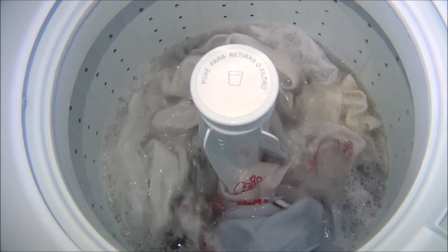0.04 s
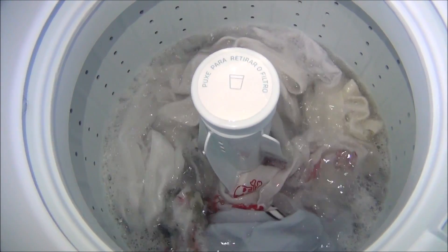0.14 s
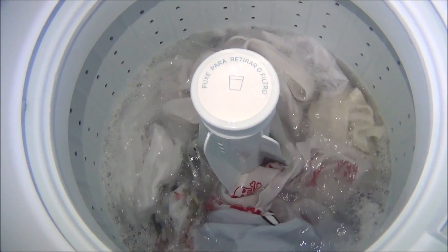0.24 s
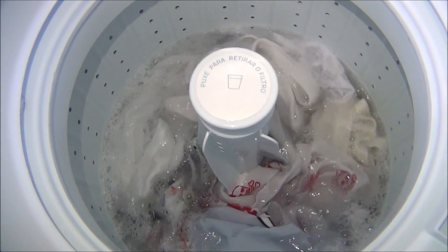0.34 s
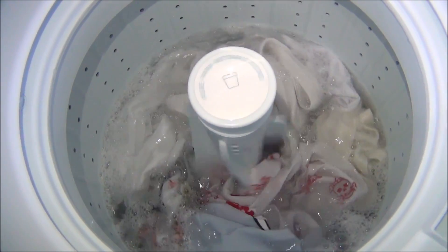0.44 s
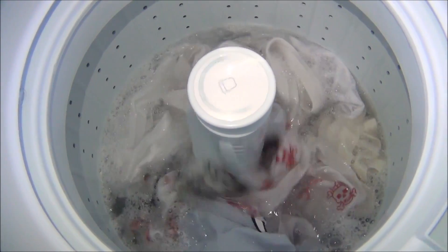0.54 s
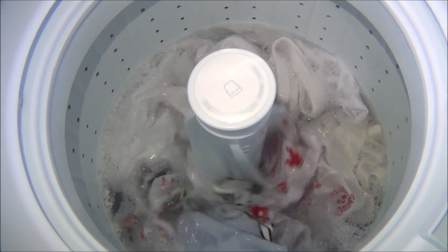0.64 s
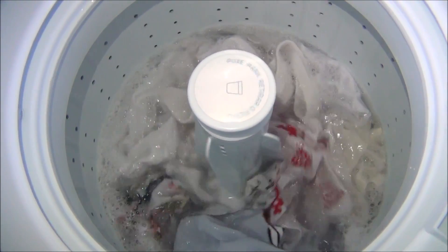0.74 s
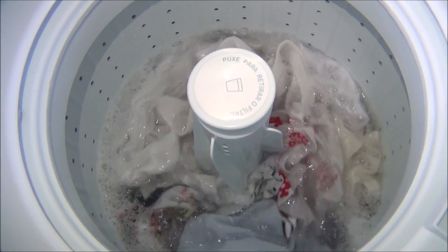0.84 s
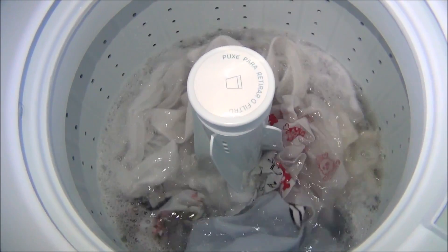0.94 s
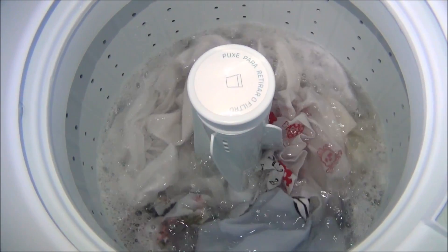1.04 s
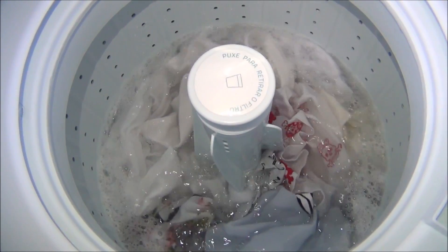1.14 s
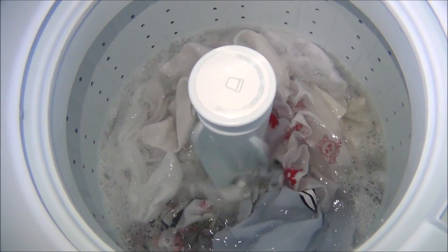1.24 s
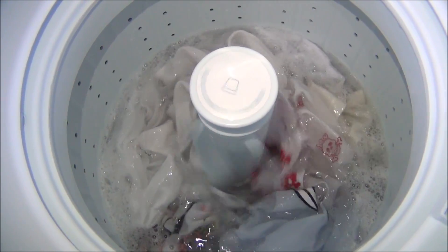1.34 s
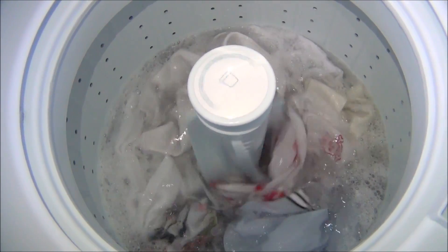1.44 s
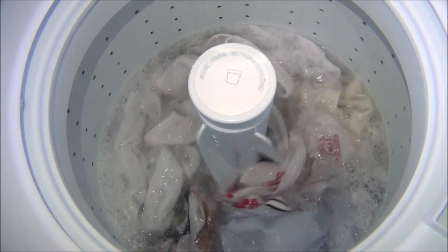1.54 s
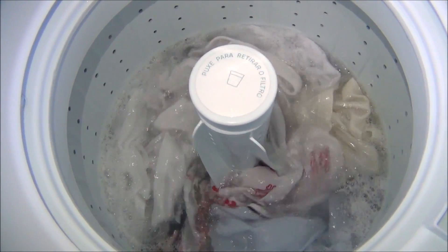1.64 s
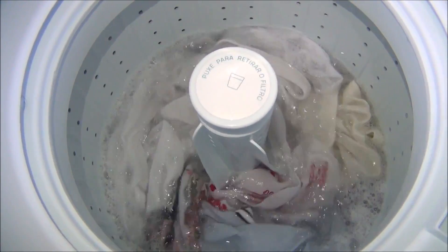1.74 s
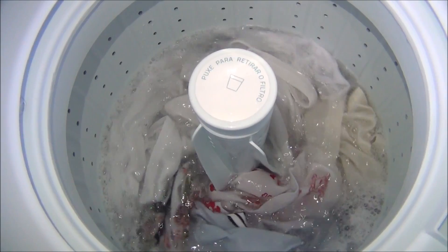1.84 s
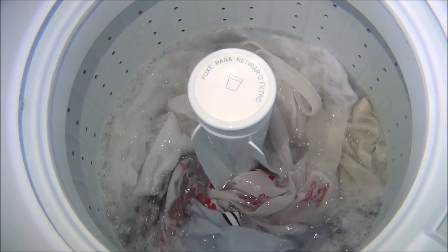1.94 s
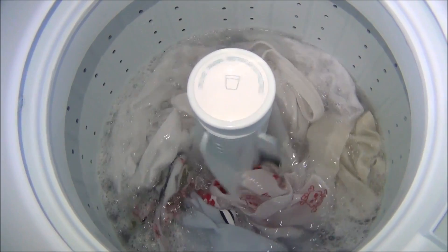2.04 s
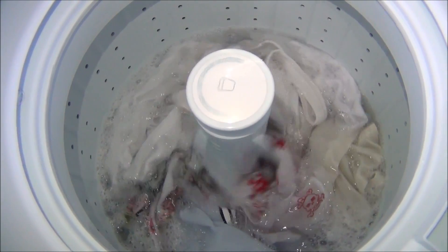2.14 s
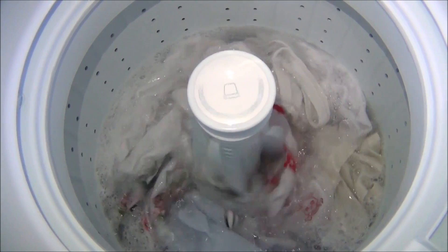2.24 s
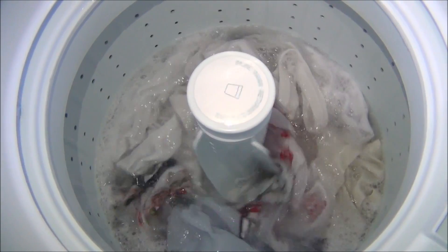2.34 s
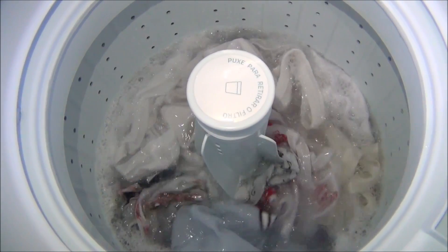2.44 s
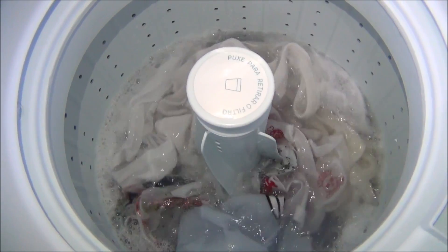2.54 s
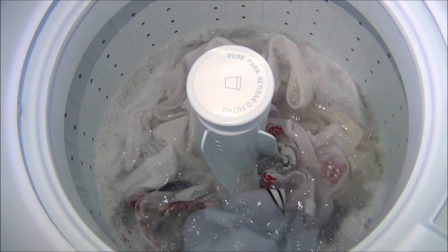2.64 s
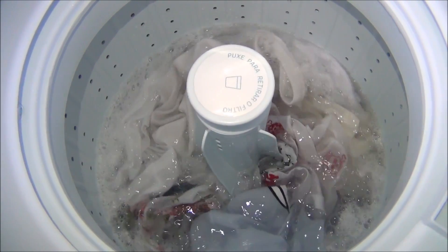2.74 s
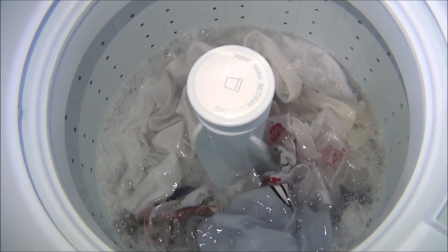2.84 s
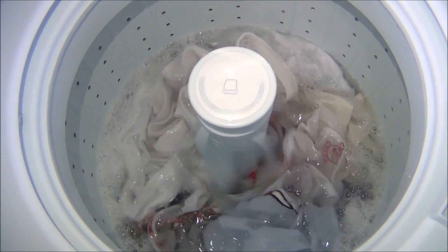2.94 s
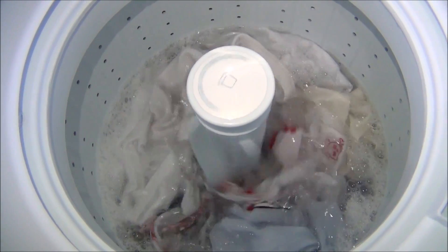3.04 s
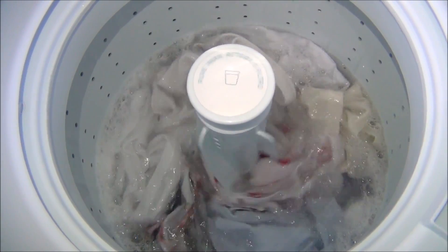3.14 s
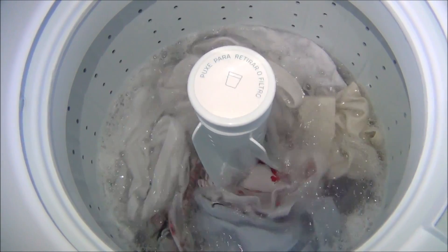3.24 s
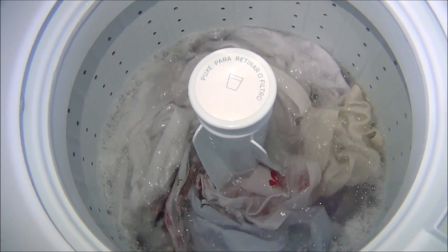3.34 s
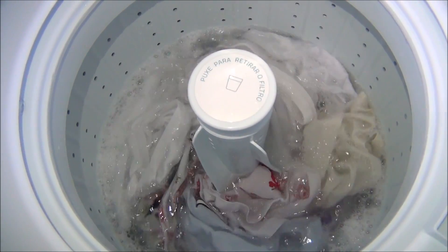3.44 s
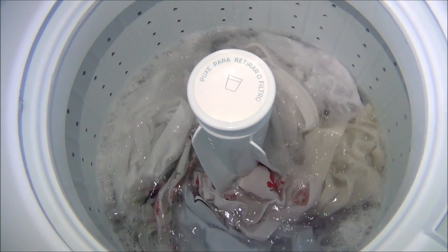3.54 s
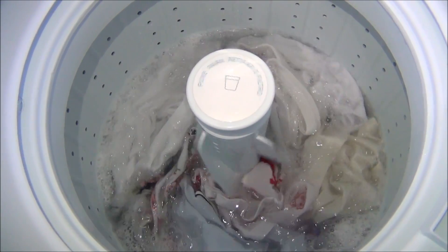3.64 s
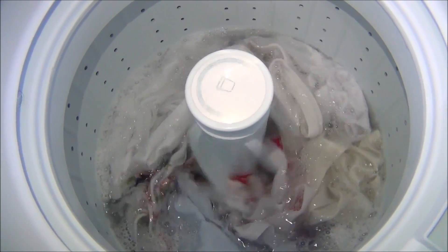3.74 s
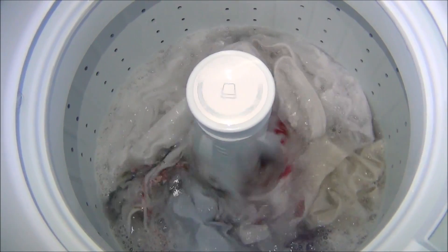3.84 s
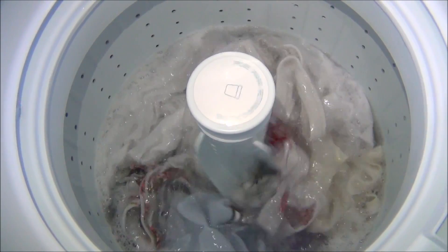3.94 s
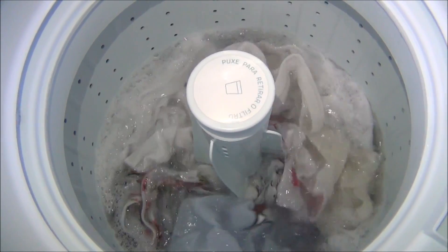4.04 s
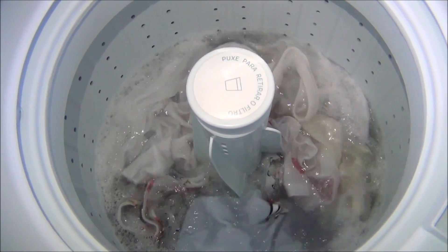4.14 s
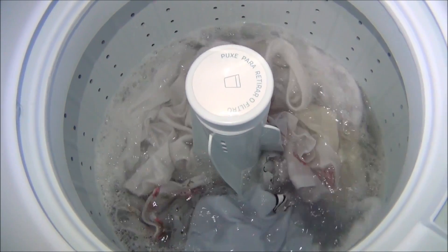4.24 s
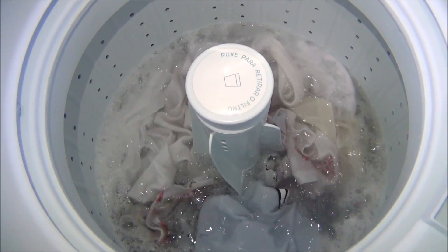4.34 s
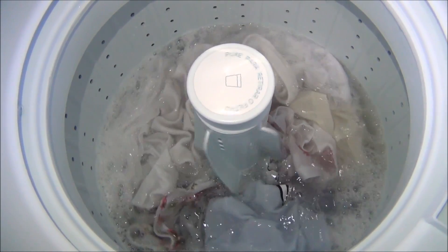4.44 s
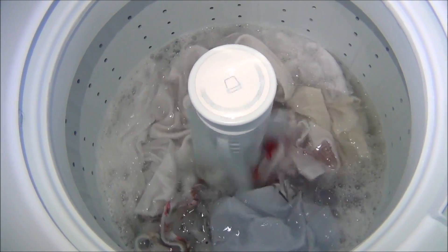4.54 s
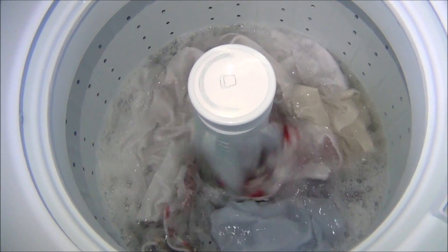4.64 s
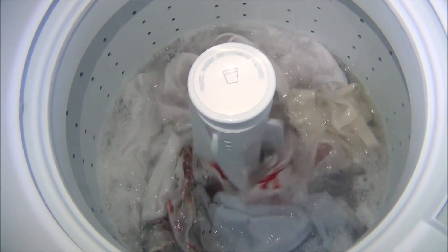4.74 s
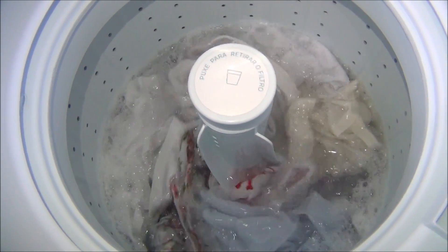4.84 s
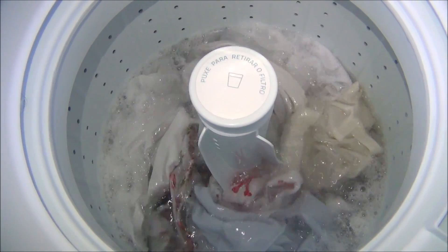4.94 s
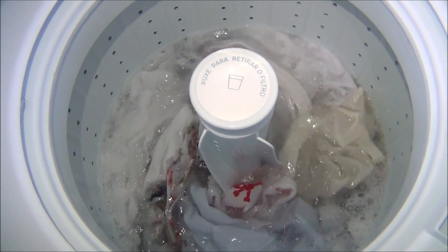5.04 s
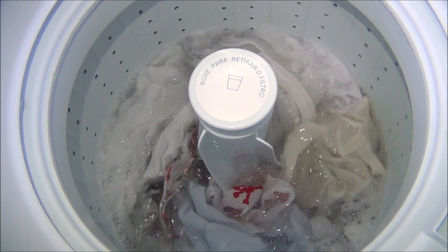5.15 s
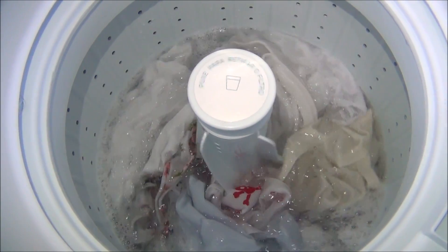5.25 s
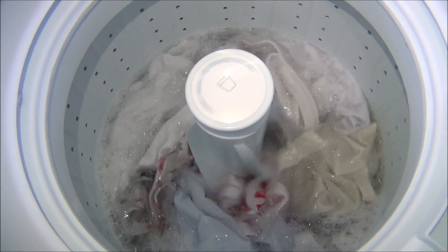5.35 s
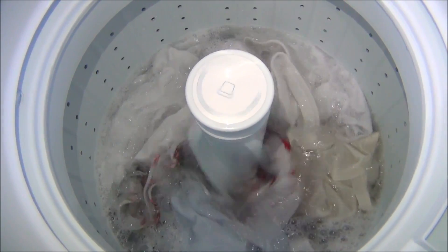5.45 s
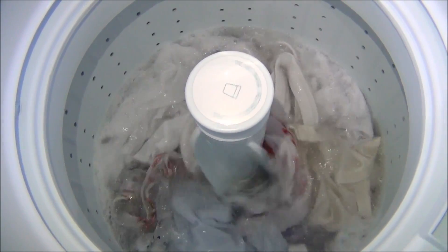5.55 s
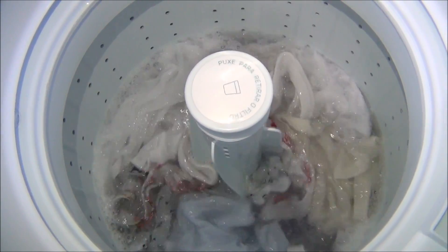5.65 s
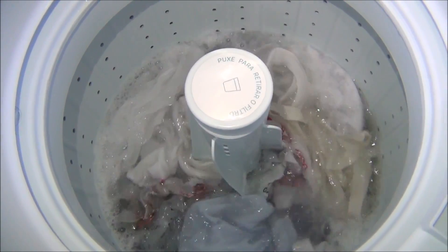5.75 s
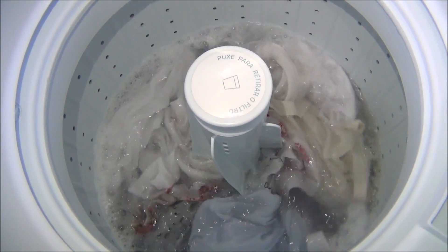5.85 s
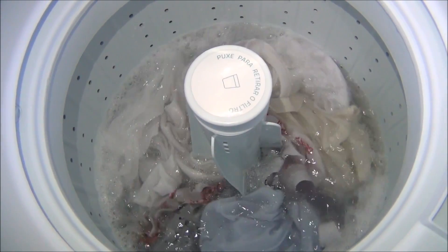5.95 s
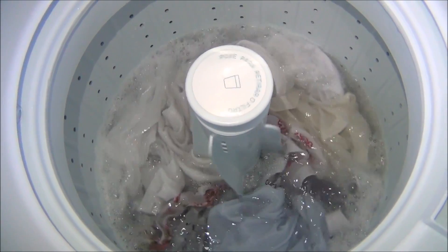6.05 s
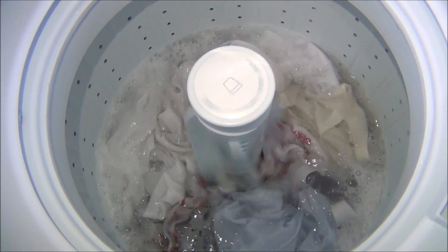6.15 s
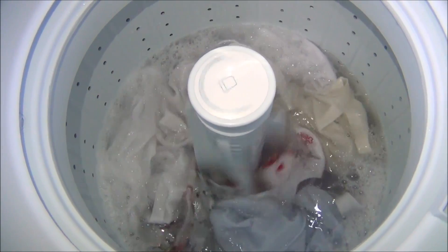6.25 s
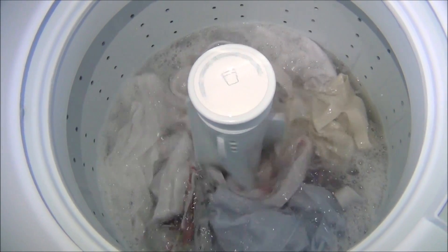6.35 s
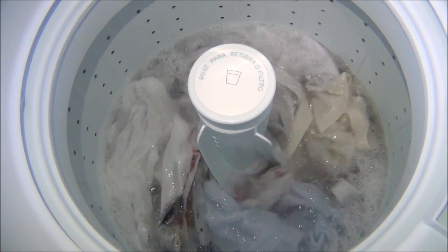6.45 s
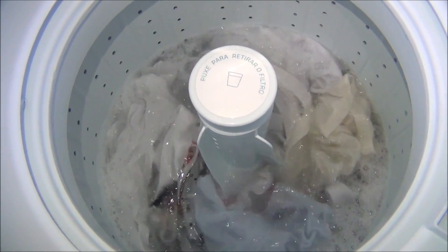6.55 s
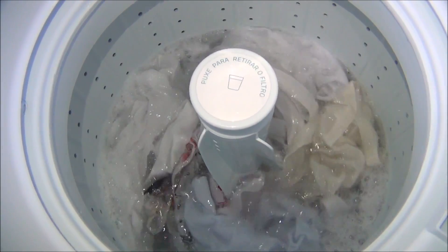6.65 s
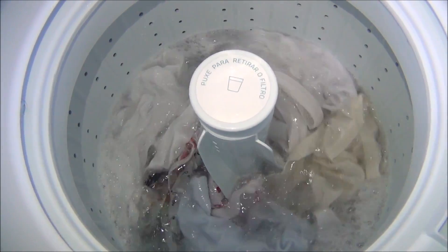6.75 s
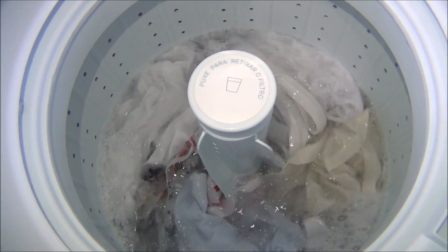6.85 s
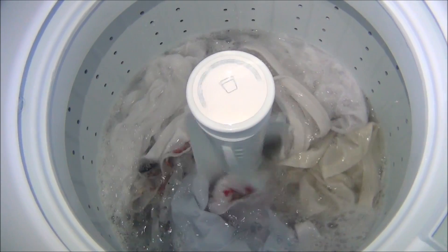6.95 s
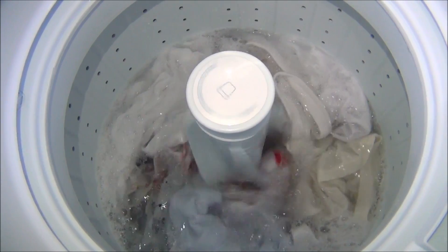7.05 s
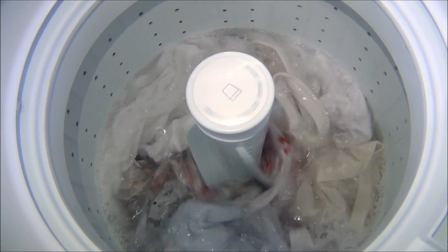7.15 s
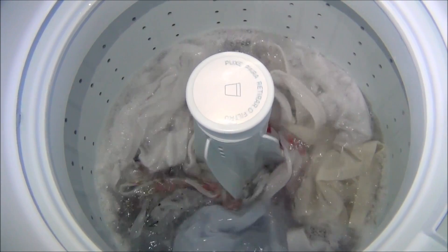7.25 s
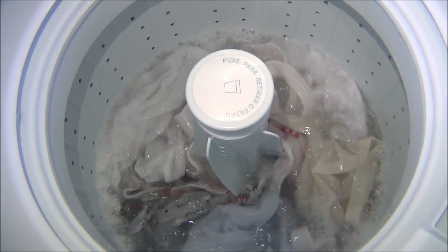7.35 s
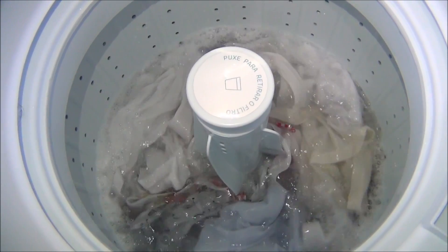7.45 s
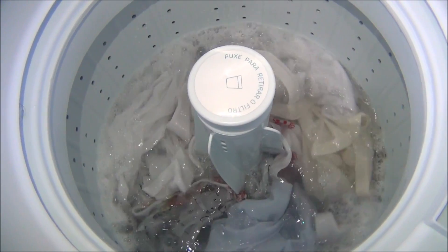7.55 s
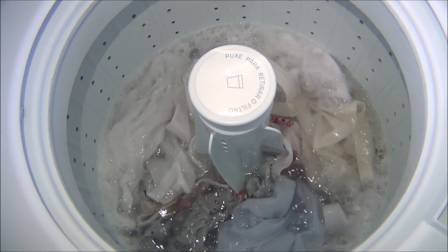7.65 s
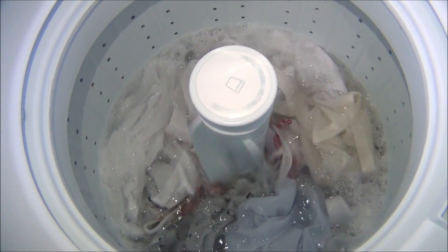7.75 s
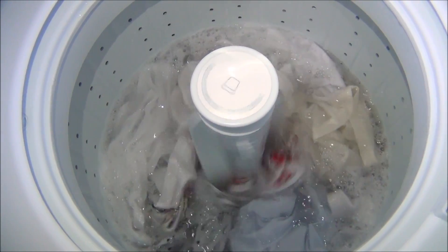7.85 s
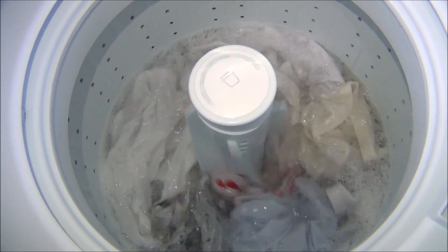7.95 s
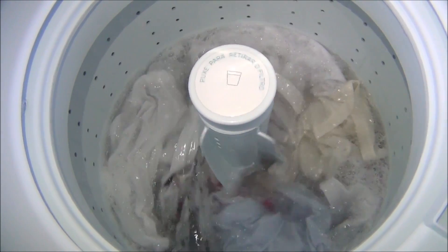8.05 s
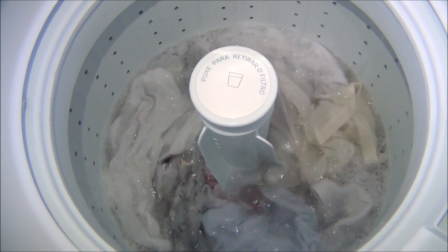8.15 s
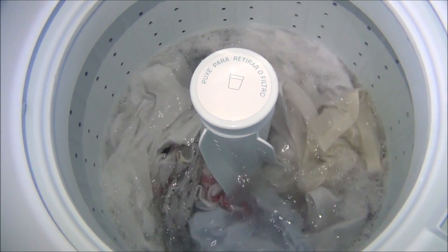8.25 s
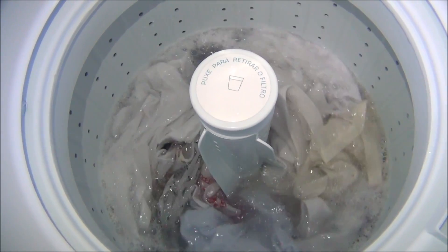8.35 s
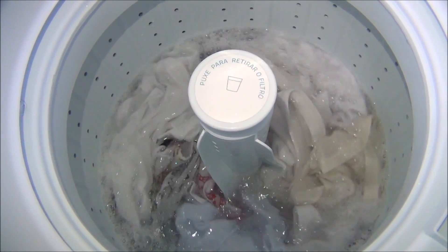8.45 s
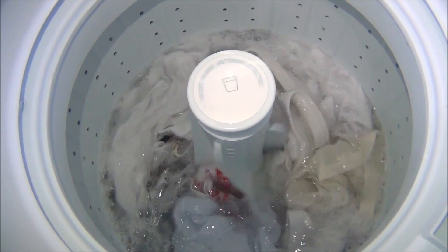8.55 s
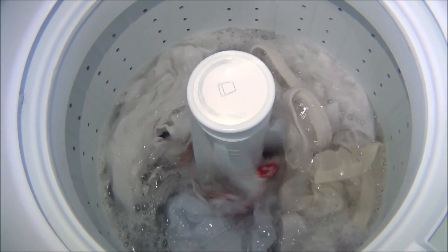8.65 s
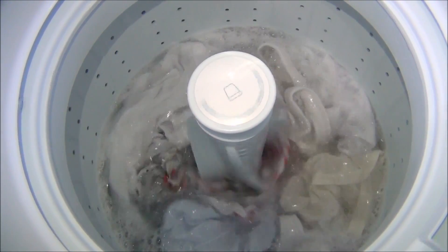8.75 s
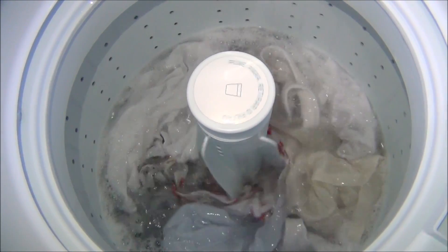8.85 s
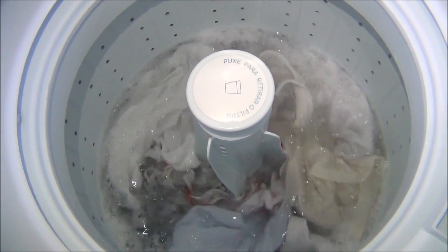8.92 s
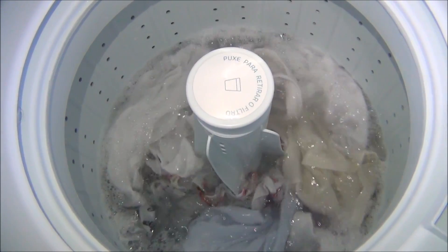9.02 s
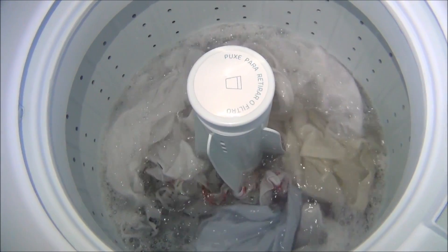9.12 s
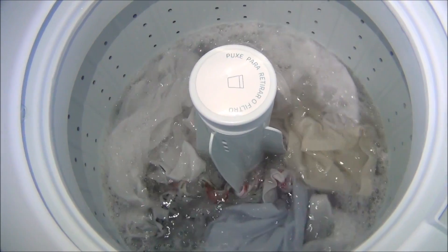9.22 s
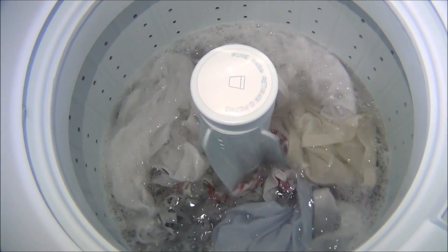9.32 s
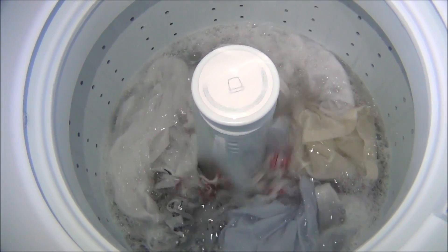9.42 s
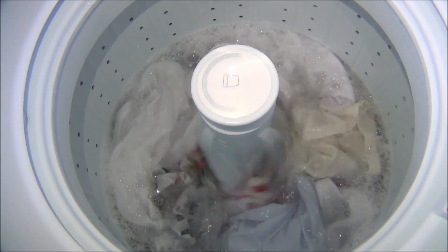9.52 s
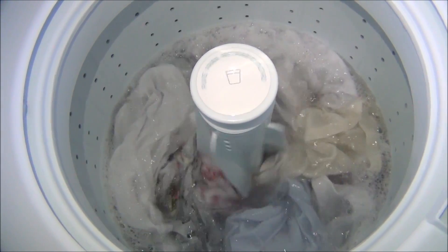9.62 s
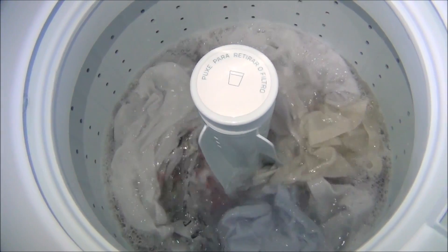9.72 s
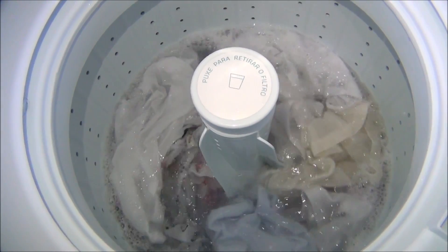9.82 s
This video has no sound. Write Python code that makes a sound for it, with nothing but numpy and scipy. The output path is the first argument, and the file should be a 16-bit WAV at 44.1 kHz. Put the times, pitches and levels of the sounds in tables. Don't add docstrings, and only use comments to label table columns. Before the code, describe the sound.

A top-load washing machine agitates: a humming motor stroke about every 0.8 seconds, each throwing up a hissing, gurgling surge of water that drains in drips.

```python
import sys
import numpy as np
from scipy import signal
from scipy.fft import rfft, irfft, next_fast_len
from scipy.io import wavfile
from scipy.ndimage import uniform_filter1d, map_coordinates

SR = 44100
rng = np.random.default_rng(int(sys.argv[2]) if len(sys.argv) > 2 else 0)


def makeup_ratio(level_db):
    decades = np.asarray(level_db, float) / 20
    return 10 ** decades


def int16_out(signal):
    q = np.round(np.clip(np.atleast_2d(signal).T, -1, 1) * 32767)
    wavfile.write(sys.argv[1], SR, q.astype(np.int16))


N = 435708

KICKS = [-0.38, 0.430, 1.233, 2.049, 2.856, 3.661, 4.482, 5.289, 6.097, 6.913, 7.731, 8.539, 9.347]
# motor_effort_db, surge_db, surge_full_after_s, surge_lasts_s
STROKES = [(-20, -14, 0.17, 0.15), (-20.5, -18.5, 0.2, 0.14), (-21, -17.5, 0.19, 0.14),
           (-20, -17, 0.19, 0.17), (-20.5, -17.5, 0.19, 0.17), (-19.5, -16, 0.21, 0.13),
           (-20.5, -17, 0.19, 0.17), (-20, -17, 0.2, 0.14), (-19.5, -17, 0.19, 0.17),
           (-20, -16.5, .2, 0.13), (-21, -16.5, 0.19, 0.11), (-21, -17.5, 0.21, 0.14),
           (-20.5, -19, 0.17, 0.18)]
# pitch_hz, width_hz, level_db
CABINET = [(265.5, 17.8, -2.5), (357.4, 27, 2), (462, 27.5, -3.5), (517.6, 34, -5), (581.4, 39, -7),
           (697, 41, -6), (782, 53, -7.5), (920, 150, -11)]
# pitch_hz, width_hz, level_db
FRAME = [(30, 15, -13.5), (75.6, 19, -2.5), (93, 32, -3), (113.7, 15.5, -2), (160.6, 18, 3)]
# pitch_hz, over_effort_db, after_s, swells_s, holds_s, fade_db_per_s
LURCH = (72, -11, .16, .045, .02, -150)
RUN_DOWN = (355, -6, .25, .04, .08, -400)
# pitch_hz, level_db
SLOSH = [(410, -32), (700, -40), (1020, -7.5), (1770, 0), (2330, -5), (3060, -4.5), (6000, -16.5),
         (7800, -44), (13200, -120)]
# pitch_hz, level_db
SPRAY = [(2060, -17.5), (3500, -3.5), (4430, -4.5), (6740, -7.5), (7410, -8), (11600, -4.5), (15000, -9),
         (16000, -14.5)]
# pitch_hz, width_hz, gain_db
AIR_COLUMN = [(1183, 180, -10), (1705, 60, 7), (2560, 50, -13.5), (3100, 210, 8)]
# peak_s, level_db, spray_over_slosh_db
SPLASHES = [(0.013, -28, -15), (0.28, -35, -15), (0.885, -25, -18), (0.74, -12.5, -22), (0.943, -27, -7),
            (1.366, -17.5, -8), (1.80, -30, -5.5), (2.34, -15, -21), (2.99, -21, -25), (3.18, -29, -10),
            (3.396, -26, 1.5), (3.53, -41, -13), (4.14, -37, 0), (4.79, -27, -9), (5.083, -30.5, -2.5),
            (5.694, -16, -11), (5.761, -30, -4), (6.57, -21, -14), (6.595, -24.5, -4), (8.165, -47, -5),
            (7.39, -28.5, -1), (7.46, -43, -14), (8.02, -14.5, -3), (8.215, -17, -20), (8.258, -21, -17),
            (9.015, -32, -3), (9.049, -33, 8.5), (9.832, -31, -12)]
# start_s, peak_db
BLOOPS = [(0.616, -11.5), (0.7443, -7), (1.3642, -9), (1.452, -10), (1.4847, -6.5), (2.252, -7),
          (3.171, -12), (3.1851, -3), (4.204, -15.5), (4.795, -1), (5.76, -13.5), (6.2148, -16),
          (6.3125, -6), (6.352, 1), (6.3847, 0.5), (6.4784, -28), (6.573, -20), (7.1848, -2), (7.315, -8),
          (8.015, -2), (8.032, -1.5), (8.2155, -9), (8.31, -22), (8.764, -6), (8.8098, -11), (8.9206, -13),
          (9.51, -16), (9.5213, -13), (9.7308, -13)]
# start_s, peak_db
DRIPS = [(0.102, -24), (0.147, -20), (0.172, -17), (0.201, -21), (0.267, -25), (0.882, -19), (0.947, -23),
         (0.996, -29), (1.731, -25), (1.849, -21), (2.449, -24), (2.484, -11), (2.558, -21), (2.574, -20),
         (2.621, -16.5), (2.67, -28), (3.336, -18), (3.401, -14), (3.437, -26), (4.33, -39), (5.009, -24),
         (5.044, -17), (5.09, -17), (5.789, -17), (5.849, -25), (6.688, -20), (7.402, -24), (7.484, -26),
         (8.971, -16), (9.042, -28)]
# start_s, peak_db, pitch_hz
GULPS = [(0.026, -4.5, 2520), (0.6389, -3.5, 3050), (0.7222, -9, 1910), (1.512, -6, 3060),
         (1.571, -5.5, 2560), (1.705, -11, 3200), (2.2218, -10, 3880), (2.3685, -6, 1920),
         (2.9924, -9, 2380), (3.0646, -6, 1440), (3.0804, 3, 3100), (3.1053, -9, 2400),
         (3.3209, -13.5, 2060), (3.3995, -4.5, 3050), (3.8513, -5.5, 3380), (4.146, -7, 3060),
         (4.636, -11, 1255), (4.6548, -11, 1215), (5.5892, -5, 2100), (6.274, -4, 2980), (6.4, 2, 3500),
         (6.601, -10, 2800), (7.159, -7.5, 1250), (7.237, -12, 1110), (7.2893, -7.5, 1174),
         (7.897, -10.5, 1250), (8.2208, -1, 2190), (8.8673, -10, 1510), (9.6633, -5.5, 3180),
         (9.8326, -16.5, 3080)]
# start_s, peak_db, centre_hz
SPITS = [(0.69, -15, 4010), (0.765, 5.5, 4140), (0.814, 3, 5960), (0.9453, -8, 4020), (1.3646, -5, 12700),
         (1.648, -7.5, 4440), (2.2217, 2.5, 4980), (2.2514, 4, 4130), (5.6416, -6, 11900),
         (3.037, -0.5, 10700), (3.1986, -5, 6820), (3.4023, -3, 4400), (4.137, -12, 5730),
         (4.1985, -10.5, 9190), (4.6334, -1, 9190), (4.6538, -2, 10200), (5.462, 0, 8150),
         (5.696, -1, 11900), (5.759, -6, 4650), (6.221, -10, 5670), (6.345, -3, 4120), (6.5074, -4.5, 5870),
         (6.547, -8, 5070), (7.0874, -4, 5510), (7.9863, -2, 6560), (8.258, -9, 6030), (8.854, 2, 4690),
         (9.0154, -4.5, 5600), (9.0527, -7, 4000), (9.5353, -0.5, 11100)]
# time_s, pitch_hz, level_db
SQUEAK = [(7.54, 10233, -64), (7.56, 9850, -60), (7.6, 9750, -63), (7.66, 10080, -59), (7.73, 9860, -56),
          (7.76, 9750, -69)]
# pitch_hz, time_to_fall_60_db_s
TUB_RING = [(300, 0.13), (1500, 0.089), (5000, 0.061), (14000, 0.034)]
# pitch_hz, level_db
HUSH = [(15, -27), (25, 15), (36, -2), (92, 2.5), (212, -10), (344, -4.5), (1130, -12.5), (1650, -9.5),
        (3920, -28.5), (16000, -28)]
# pitch_hz, side_minus_mid_db
WIDTH = [(60, -22), (110, -20), (200, -19), (380, -15.5), (700, -6.5), (1290, -14.5), (2380, -14),
         (4400, -15), (8120, -3), (15000, -21)]
# pitch_hz, lead_radians
LEAD = [(0, 0.18), (260, 0.34), (780, 0), (1120, 0.8), (2500, 0.26), (16100, 0.46)]

RAREST = .97


def drive():
    def thin_panels(hz):
        return (modes(CABINET[2:])(hz) + 0.04 * (hz > 180)) / (1 + 1j * hz / 900) ** 2

    thin_gain = shaken(full_s=.09, off_s=.28, drop_s=.11, over_db=-2, kick_db=-9, drop_db=-17.5, fade_db=-43)
    big_gain = shaken(full_s=.18, off_s=.31, drop_s=.09, over_db=-0.5, kick_db=-9, drop_db=-14, fade_db=-51,
                      overshoot_db=2)
    frame_gain = shaken(full_s=.2, off_s=.3, drop_s=.1, over_db=-8, kick_db=-6, drop_db=-5, fade_db=-50)
    parts = [(thin_panels, thin_gain), (modes(CABINET[:2]), big_gain), (modes(FRAME), frame_gain)]

    grit = rng.standard_normal((3, N)) * makeup_ratio(1.32 * wobble(60))
    swaying = makeup_ratio(0.97 * wobble(14))
    jolts = clutch_jolts()
    total = note(*LURCH) + note(*RUN_DOWN)
    for force, (body, gain) in zip(grit, parts):
        shake, steady = filtered([(force * swaying + jolts) * gain, force], body)
        total += shake / np.std(steady)
    return total


def clutch_jolts():
    blow_db, blow_s = 33, 0.00031
    jolts = np.zeros(N)
    jolts[[round(s * SR) + 1 for s in KICKS if s > 0]] = makeup_ratio(blow_db)
    for _ in range(2):
        jolts = uniform_filter1d(jolts, int(blow_s * SR))
    return jolts


def shaken(full_s, off_s, drop_s, over_db, kick_db, drop_db, fade_db, overshoot_db=0):
    knots = [0, full_s / 2, full_s, (full_s + off_s) / 2, off_s, off_s + drop_s, off_s + drop_s + 1]
    events = []
    for k, (start, (effort_db, *_)) in enumerate(zip(KICKS, STROKES)):
        halfway_db = kick_db / 2 - overshoot_db / 2
        full_db = overshoot_db * (k % 2)
        shape = np.array([kick_db, halfway_db, full_db, 0, 0, drop_db, drop_db + fade_db])
        events.append((start, knots, effort_db + over_db + shape))
    return repeated(events)


def note(hz, over_db, after, swells, holds, fade_db):
    knots = [0, swells, swells + holds, swells + holds + .2]
    shape = np.array([-20, 0, 0, .2 * fade_db])
    gain = repeated((start + after, knots, effort_db + over_db + shape)
                    for start, (effort_db, *_) in zip(KICKS, STROKES))
    unsteady = makeup_ratio(1.3 * wobble(9.6))
    pitch = hz * (1 + 0.0118 * wobble(9))
    return np.sqrt(2) * gain * unsteady * np.sin(2 * np.pi * np.cumsum(pitch) / SR)


def water():
    jumps = unit(1.43 + bursts(count=900, uneven_db=5, t60=0.027))

    rush = coloured(rng.standard_normal(N) * jumps, SLOSH)
    gurgle = swarm(count=3000, hz=2220, spread=0.335, cycles=12.2, uneven_db=6.0, rise=0.14, length=700)
    slosh = unit(filtered(0.72 * rush + 0.67 * gurgle, lambda hz: 1 + modes(AIR_COLUMN)(hz)))

    hiss = rng.standard_normal(N) * jumps
    fizz = swarm(count=12000, hz=7920, spread=0.464, cycles=17.0, uneven_db=6.5, rise=0.11, length=200) * jumps
    spray = coloured(0.84 * hiss + 0.52 * unit(fizz), SPRAY)

    slosh_gain = repeated(surge(over_db=0, grows_db=3, fade_db=-75) + splashes(sprayed=0))
    spray_gain = repeated(surge(over_db=-3, grows_db=0, fade_db=-81) + splashes(sprayed=1))
    return slosh_gain * slosh + spray_gain * spray


def surge(over_db, grows_db, fade_db):
    climb_db_per_s, drop_db, drop_s = 190, -11, 0.067
    events = []
    for start, (_, surge_db, full, lasts) in zip(KICKS, STROKES):
        end = full + lasts
        knots = [0, full, end, end + drop_s, end + drop_s + 1]
        shape = np.array([-climb_db_per_s * full - grows_db, -grows_db, 0, drop_db, drop_db + fade_db])
        events.append((start, knots, surge_db + over_db + shape))
    return events


def splashes(sprayed):
    rise_s, fall_s = 0.0097, 0.19
    knots = [0, rise_s, rise_s + fall_s]
    return [(s - rise_s, knots, db + sprayed * spray_db + np.array([-20, 0, -60]))
            for s, db, spray_db in SPLASHES]


def swarm(count, hz, spread, cycles, uneven_db, rise, length):
    draw = rng.random((count, 3))
    pitch = np.clip(hz * np.exp(spread * rng.standard_normal(count)), 300, 15500)
    size = makeup_ratio(-uneven_db * np.log(1 - RAREST * draw[:, 1]))
    start = draw[:, 0] * N / SR
    return unit(bubbles(start, pitch, size, cycles * (.5 + draw[:, 2]), rise, length))


def bursts(count, uneven_db, t60):
    draw = rng.random((count, 2))
    size = makeup_ratio(-uneven_db * np.log(1 - RAREST * draw[:, 1]))
    starts = np.bincount((draw[:, 0] * N).astype(int), size, N)
    return unit(signal.lfilter([1], [1, -makeup_ratio(-60 / (t60 * SR))], starts))


def drops():
    column_hz, scatter = 1690, .022
    bloops = [(s, db, column_hz * (1 + scatter * rng.standard_normal())) for s, db in BLOOPS + DRIPS]
    s, db, hz = np.transpose(GULPS + bloops)
    gulps = bubbles(s, hz, makeup_ratio(db + 1.5), np.full(len(s), 22.), rise=0.057, length=1200)
    plop = bubbles(np.array([4.362]), np.array([803]), makeup_ratio([-32.5]), 45, rise=0.92, length=1500)
    return gulps + plop + spits()


def spits():
    out = np.zeros(N)
    t = np.arange(600) / SR
    for s, db, hz in SPITS:
        puff = rng.standard_normal(len(t)) * makeup_ratio(db - 5.0 - 60 * t / 0.024)
        b, a = signal.iirpeak(min(hz, 15000), 1.6, SR)
        piece = out[round(s * SR):][:len(t)]
        piece += signal.lfilter(b, a, puff)[:len(piece)]
    return out


def bubbles(s, hz, size, cycles, rise, length):
    t = np.arange(length) / SR
    u = t * (hz / cycles)[:, None]
    shape = np.exp(-3 * u) * (1 - np.exp(-9 * u))
    wave = size[:, None] * shape * np.sin(2 * np.pi * hz[:, None] * t * (1 + rise * u / 2))
    where = np.round(s * SR).astype(int)[:, None] + np.arange(length)
    return np.bincount(where.ravel(), wave.ravel(), N + length)[:N]


def squeak():
    times, pitches, levels = np.transpose(SQUEAK)
    t = np.arange(N) / SR
    hz = np.interp(t, times, pitches)
    db = np.interp(t, times, levels)
    on = (t > times[0]) & (t < times[-1])
    return on * makeup_ratio(db + 1) * np.sin(2 * np.pi * np.cumsum(hz) / SR)


def tub_echoes():
    shared = tail(TUB_RING, length=12000)
    short = tail([(hz, 0.083 * t60) for hz, t60 in TUB_RING], length=3000)
    split = np.r_[-short[:0:-1], 0, short[1:]] / np.sqrt(2)
    return shared, split


def tail(t60s, length):
    hz, t, z = signal.stft(rng.standard_normal(length), SR, nperseg=128)
    echo = signal.istft(z * makeup_ratio(-60 * t / along(t60s, hz)[:, None]), SR, nperseg=128)[1]
    return echo / np.linalg.norm(echo)


def room_hush():
    return makeup_ratio(-42) * np.array([coloured(rng.standard_normal(N), HUSH) for _ in range(2)])


def unit(x):
    return x / np.sqrt(np.mean(x ** 2) + 1e-20)


def along(points, hz):
    f, v = np.transpose(points)
    return np.interp(np.log(hz + 1), np.log(f + 1), v)


def wobble(rate):
    return map_coordinates(rng.standard_normal(1000), [np.arange(N) * min(rate / SR, 990 / N)])


def filtered(x, response):
    m = next_fast_len(N + SR // 2)
    return irfft(rfft(x, m) * response(np.fft.rfftfreq(m, 1 / SR)), m)[..., :N]


def coloured(x, spectrum):
    return unit(filtered(x, lambda hz: makeup_ratio(along(spectrum, hz))))


def modes(table):
    def response(f):
        total = 0
        for k, (centre, width, db) in enumerate(table):
            damping = 1j * f * width
            total = total + (-1) ** k * makeup_ratio(db) * damping / (centre ** 2 - f ** 2 + damping)
        return total
    return response


def repeated(shapes):
    power = np.zeros(N + 3 * SR)
    for s, knots, dbs in shapes:
        part = makeup_ratio(np.interp(np.arange(int(knots[-1] * SR)) / SR, knots, dbs)) ** 2
        power[round((s + 1) * SR):][:len(part)] += part
    return np.sqrt(power[SR:SR + N])


def scene():
    shared_echo, split_echo = tub_echoes()
    mid_hush, side_hush = room_hush()
    near = drive() + water() + drops() + squeak()
    shared_ring = signal.oaconvolve(near, shared_echo)[:N]
    split_ring = signal.oaconvolve(near, split_echo, 'same')
    mid = near + makeup_ratio(-9.5) * shared_ring + mid_hush
    lead = filtered(mid, lambda hz: 1j * np.tan(along(LEAD, hz) / 2))
    spread = filtered(0.94 * split_ring + 1.2 * side_hush, lambda hz: makeup_ratio(along(WIDTH, hz)))
    side = lead + spread
    return np.array([mid + side, mid - side]) * makeup_ratio([[-.2], [.2]])


def low_pass(x):
    return signal.sosfilt(signal.butter(12, 16510, fs=SR, output="sos"), x)


def record(dry):
    ceiling, hardness = 1.02, 6
    dry = filtered(dry, lambda hz: hz < 15750)
    mix = dry / (1 + np.abs(dry / ceiling) ** hardness) ** (1 / hardness)
    return low_pass(mix)


dry = scene()
out = record(dry)
int16_out(out)
```